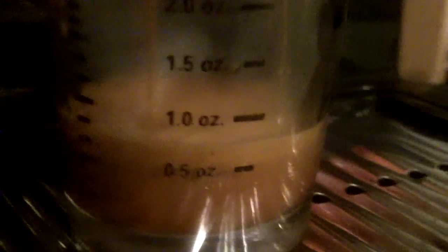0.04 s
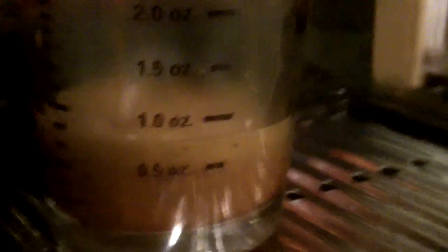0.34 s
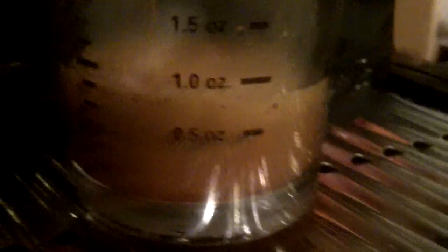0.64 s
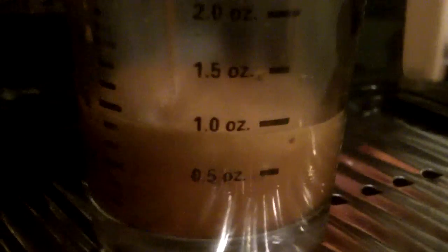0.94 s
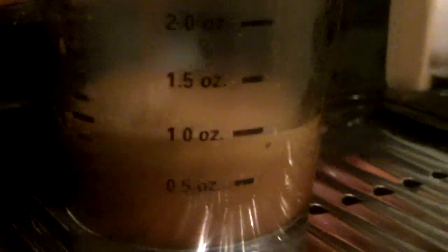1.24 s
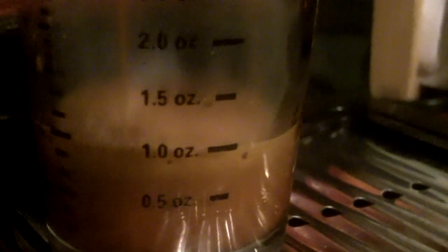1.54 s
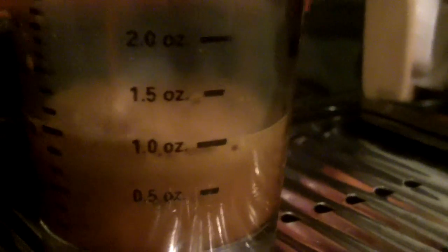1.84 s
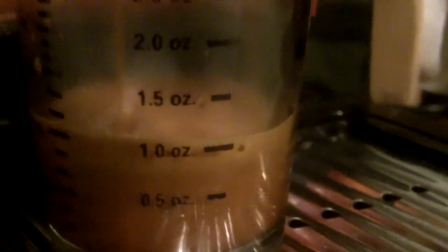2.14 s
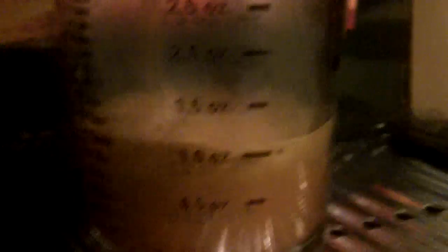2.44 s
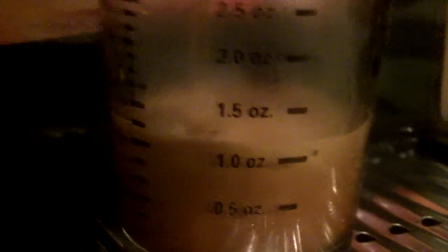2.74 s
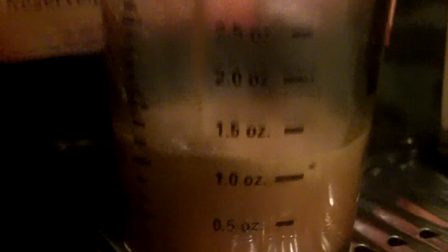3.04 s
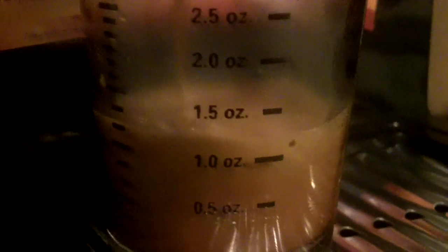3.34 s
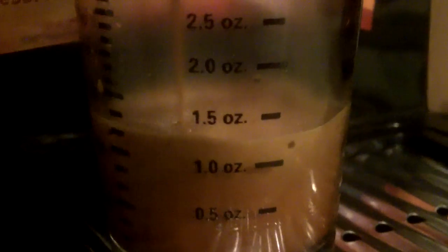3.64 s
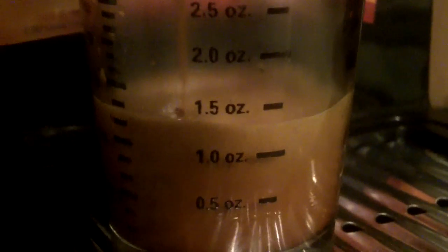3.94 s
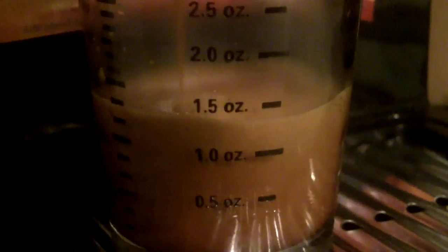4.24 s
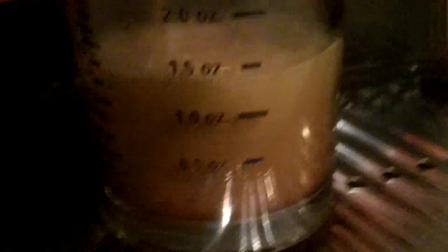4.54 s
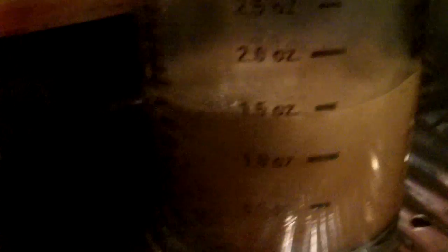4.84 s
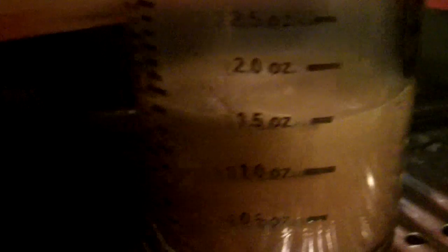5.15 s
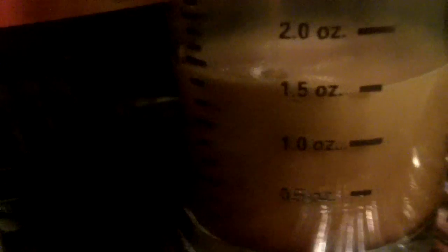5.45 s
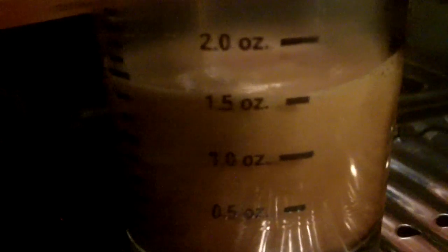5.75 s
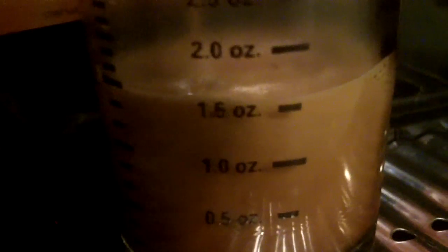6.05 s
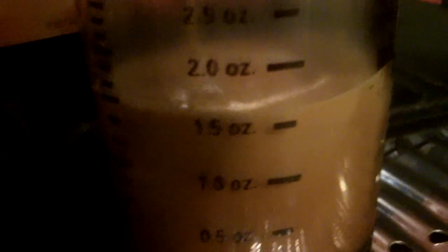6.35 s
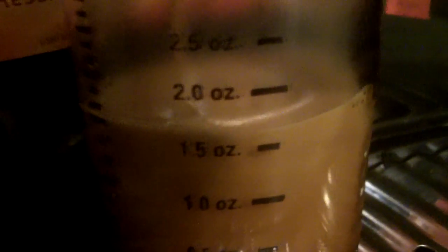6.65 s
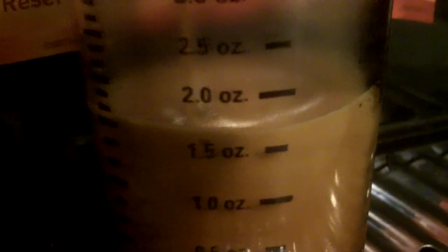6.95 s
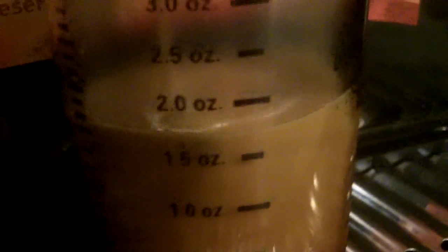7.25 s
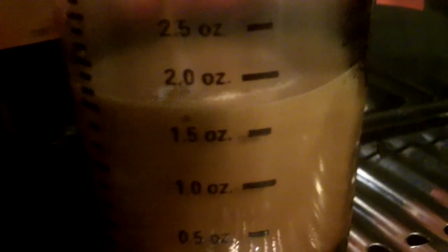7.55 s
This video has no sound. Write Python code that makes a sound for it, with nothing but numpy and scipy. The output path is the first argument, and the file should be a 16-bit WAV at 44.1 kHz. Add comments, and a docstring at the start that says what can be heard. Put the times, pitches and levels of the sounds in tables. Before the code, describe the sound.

An espresso machine's pump buzzes steadily up close, with metal rattling and coffee spitting and gurgling into a glass, turning harsher near the end.

```python
"""A quiet kitchen, where an espresso machine pulls a shot into a glass, heard close up.
The vibratory pump strokes once per mains cycle: its plunger knocks drone through the case and set
the panels and the steel drip tray chattering. Air in the water makes the spout spit, gurgle and
sizzle, and a few soft, low bumps pass underneath. Late on the valve strikes bare metal and the
buzz turns harsh."""
import sys
import numpy as np
from scipy import signal
from scipy.fft import rfft, irfft, next_fast_len
from scipy.io import wavfile
from scipy.ndimage import map_coordinates

SR = 44100
rng = np.random.default_rng(int(sys.argv[2]) if len(sys.argv) > 2 else 0)


def generate_wav(signal):
    """Clip the signal to [-1, 1] and save it as 16-bit WAV at the path in sys.argv[1]."""
    frames = np.transpose(np.atleast_2d(signal))
    scaled = np.clip(frames, -1, 1) * 32767
    pcm = np.round(scaled).astype(np.int16)
    wavfile.write(sys.argv[1], SR, pcm)


N = 343539

# room tone: (frequency [Hz], relative level [dB])
ROOM_EQ = [(8, -3), (25, 0.5), (45, -27), (100, -15), (300, -13), (1500, -43), (5000, -40), (15000, -56)]
# plunger knocks and rebounds in one stroke: (time [ms], strength [0-1], contact time [ms])
KNOCKS = [(2.1, .36, .22), (3.4, .45, .35), (5.2, .85, .27), (9.0, .95, .38), (10.5, .25, .35),
          (15.9, .7, .47)]
# the drone under a firm, an easing and a slack load: (harmonic [x mains], relative level [dB])
FIRM_DRONE = [(1, -6), (2, -11.5), (3, 2), (4, -14), (5, 2.5), (6, -8), (7, -15), (8, -5.5), (9, -2),
              (10, -4), (11, -21), (12, -11), (13, -19.5), (14, -12), (15, -25.5), (16, -15), (17, -13),
              (18, -68.5), (19, -22), (20, -51), (21, -32), (22, -49), (23, -32), (24, -30.5)]
EASING_DRONE = [(1, -5), (2, -8), (3, 4.5), (4, -22), (5, 1), (6, -8.5), (7, -7), (8, -5.5), (9, 0.5),
                (10, -2.5), (11, -6.5), (12, -12.5), (13, -9), (14, -18), (15, -50), (16, -14), (17, -31.5),
                (18, -9), (19, -18), (20, -43), (21, -26), (22, -99), (23, -46.5), (24, -21.5)]
SLACK_DRONE = [(1, -8.5), (2, -9), (3, 2.5), (4, -5), (5, 2.5), (6, -6.5), (7, -13), (8, -9), (9, 1),
               (10, -10.5), (11, -4.5), (12, -5.5), (13, -14.5), (14, -46), (15, -11.5), (16, -11.5),
               (17, -10), (18, -26), (19, -16), (20, -35), (21, -29), (22, -36), (23, -19.5), (24, -22)]
# the pump's load letting go: (time [s], ease [0 firm, 1 easing, 2 and up slack])
LOAD_EASE = [(0, 0.33), (4.2, 0), (5.2, 0.97), (5.5, 1.4), (6.4, 0.82), (7.0, 1.7), (7.5, 2), (7.79, 4)]
# air passing with the water: (start [s], end [s], strength [0-1])
GUSHES = [(.2, 1.1, 0.6), (1.3, 1.6, 0.26), (3.95, 4.9, 0.18), (5.3, 5.95, 0.93), (6.1, 6.6, 0.53),
          (6.85, 7.4, 0.4)]
# the hose shuddering: (start [s], end [s], level [dB])
SHUDDERS = [(0.44, 1.047, -38.5), (2.297, 3.4, -41.5), (3.95, 4.448, -51), (5.25, 5.513, -51)]
# rattle of the loose parts: (time [s], relative panel level [dB], relative tray level [dB])
RATTLE_LEVELS = [(0.0, -45, -42.5), (0.28, -48, -45.5), (0.39, -66, -48), (0.5, -44, -44.5),
                 (0.59, -55, -51.5), (0.67, -59, -46), (1.78, -50.5, -49.5), (3.01, -44.5, -45.5),
                 (3.9, -46, -48), (6.49, -41.5, -39), (6.75, -41, -48), (6.9, -43.5, -39.5),
                 (7.35, -43.5, -36.5), (7.55, -45, -47.5), (7.79, -42, -38)]
# a thin steel plate singing along: (time [s], relative level [dB])
PLATE_LEVELS = [(0.0, -59), (0.82, -52), (0.89, -66), (1.78, -61), (1.84, -53), (2.45, -58), (2.58, -50),
                (3.14, -53.5), (5.1, -50), (6.12, -41), (7.12, -49), (7.79, -43.5)]
# the valve hitting bare metal: (start [s], end [s], strength [0-1])
HARD_SPELLS = [(6.15, 6.6, .25), (6.66, 7.39, 0.89), (7.66, 7.79, .85)]
# resonances of each part: (frequency [Hz], width [Hz], relative level [dB])
HOSE_MODES = [(401, 52, 4.5), (790, 110, -6.5), (978, 160, -5), (1380, 98, -14.5)]
PANEL_MODES = [(1460, 100, -3), (1727, 107, -5), (1990, 115, -3), (2330, 31, 0.5), (2420, 44, -1.5)]
PLATE_MODES = [(2390, 57, 8), (5450, 11, -4.5)]
VALVE_MODES = [(3000, 370, -4.5), (3374, 130, 1.5), (3760, 310, -4)]
TRAY_MODES = [(5397, 29, 8), (5570, 160, -2), (6516, 123, 1.5), (7020, 55, -4), (7620, 43, -11),
              (7700, 140, -2), (8680, 68, -0.5), (9016, 23, -1), (9125, 140, -4.5), (10420, 78, -8),
              (10740, 80, -14.5), (13170, 280, -14.5)]
GLASS_MODES = [(3170, 160, -1), (6510, 134, 1.5)]
# tone of the squirts, hard valve hits, tray rattle and spray: (frequency [Hz], relative level [dB])
SQUIRT_EQ = [(60, -6.5), (200, -8.5), (400, -2), (650, 2.5), (850, 7), (1050, -1), (1300, -2.5),
             (1600, -11), (3000, -10.5), (6000, -51.5)]
HARD_VALVE_EQ = [(3500, -25), (5000, -31), (5450, 5), (6000, -10), (6500, -6), (7700, 6), (9000, -9),
                 (9900, -24), (10370, 4), (11000, -36), (12600, -20), (13150, -13), (15000, -43)]
TRAY_EQ = [(2590, -68.5), (4400, -18), (5160, -10), (5410, -5), (5970, -3.5), (6480, 3), (7570, 2.5),
           (8220, -5), (8920, -14.5), (9840, -8.5), (10600, -17), (11300, -16), (12100, -27), (13300, -30),
           (15100, -35)]
SPRAY_EQ = [(2000, -42), (4000, -21), (5200, 1), (6500, 2), (8000, 3), (10000, -17), (13000, -36),
            (15000, -26)]
# the loudest spits at the spout: (time [s], relative level [dB])
SPITS = [(0.1141, -33), (0.196, -23), (0.3501, -21), (0.5133, -24), (0.679, -23.5), (0.7597, -29),
         (0.782, -22), (0.9951, -27), (1.0799, -34), (1.279, -19), (1.4147, -27), (1.495, -28),
         (1.6466, -26), (1.8926, -25.5), (2.89, -24), (3.9853, -27), (4.6129, -18.5)]
# the largest bubbles: (time [s], level [dB])
BLIPS = [(0.2664, -23.5), (0.317, -25), (0.4188, -22), (0.4788, -24), (0.811, -24), (1.1077, -22.5),
         (1.278, -27), (1.4947, -25), (1.646, -22), (1.7596, -26)]
# soft bumps of a hand: (time [s], relative level [dB])
BUMPS = [(.23, -29), (.29, -23), (0.438, -26), (4.55, -34)]

MAINS_HZ = 60.0158
# chatter within a stroke: (under a firm load, change as it eases, change with hard valve hits)
PUSH_MS = (12.5, -3.5, 2.3)
RETURN_MS = (4.0, -2.9, .1)
RETURN_SHARE = (.15, 0.21, -0.24)


def amp(db):
    """Decibels to gain."""
    return 10 ** (np.asarray(db) / 20)


def unit(x):
    """Scaled to rms 1."""
    return x / np.sqrt(np.mean(x ** 2) + 1e-20)


def curves(rows, at=None):
    """An envelope for each column after the time, per sample or at given times."""
    times, *columns = np.transpose(rows)
    return [np.interp(np.arange(N) / SR if at is None else at, times, column) for column in columns]


def spells(rows, attack_s, release_s, at=None):
    """Each (start, end, size) rises, holds and dies away; per sample or at given times."""
    t = np.arange(N) / SR if at is None else at
    return sum(size * np.clip((t - start) / attack_s, 0, 1) * np.exp(-np.maximum(t - end, 0) / release_s)
               for start, end, size in rows)


def wobble(rate):
    """A smooth random curve, rate knots a second."""
    knots = rng.standard_normal(int(N * rate / SR) + 4)
    coarse = np.arange(0, N, 64)
    return np.interp(np.arange(N), coarse, map_coordinates(knots, [coarse * rate / SR]))


def filtered(x, response):
    """x through a complex frequency response."""
    size = 2 * next_fast_len(N // 2 + SR // 4)
    return irfft(rfft(x, size) * response(np.fft.rfftfreq(size, 1 / SR)), size)[:N]


def eq(x, points):
    """x through a minimum-phase EQ curve."""
    point_hz, db = np.transpose(points)

    def response(hz):
        gain = amp(np.interp(np.log(hz + 1), np.log(point_hz), db))
        cepstrum = irfft(np.log(gain))
        cepstrum[1:len(hz) - 1] *= 2
        cepstrum[len(hz):] = 0
        return np.exp(rfft(cepstrum))
    return filtered(x, response)


def ringing(x, modes):
    """x through a bank of resonators of alternating polarity."""
    def response(f):
        return sum((-1) ** k * amp(db) * 1j * f * width / (hz * hz - f * f + 1j * f * width)
                   for k, (hz, width, db) in enumerate(modes))
    return filtered(x, response)


def band(x, low_hz, high_hz, order=6):
    """Steep band-pass."""
    return filtered(x, lambda f: 1 / (1 + (low_hz / (f + 1)) ** order) / (1 + (f / high_hz) ** order))


def impulses(times, sizes):
    """Single blows at the given moments."""
    at = np.round(times * SR).astype(int)
    inside = (at >= 0) & (at < N)
    return np.bincount(at[inside], sizes[inside], N)


def bursts(blows, life_ms):
    """Every blow becomes a short burst of noise."""
    t = np.arange(SR // 20) / SR
    power = signal.fftconvolve(blows ** 2, np.exp(-2000 * t / life_ms))[:N]
    return np.sqrt(np.abs(power)) * rng.standard_normal(N)


def strokes():
    """Start time of every pump stroke."""
    return np.arange(int(N / SR * MAINS_HZ) + 1) / MAINS_HZ


def air(at=None):
    """How much air the water carries, 0-1."""
    return spells(GUSHES, attack_s=.083, release_s=.34, at=at)


def hardness(at=None):
    """How hard the valve strikes, 0-1."""
    return spells(HARD_SPELLS, attack_s=.15, release_s=.05, at=at)


def per_stroke(rule):
    """A value for each stroke that follows the load and the valve."""
    firm, eased, hard = rule
    start = strokes()
    return firm + eased * np.tanh(1.5 * curves(LOAD_EASE, start)[0]) + hard * hardness(start)


def room_tone(level_db=-44.5):
    """A bed of quiet kitchen air, mostly low rumble."""
    return amp(level_db) * unit(eq(rng.standard_normal(N), ROOM_EQ))


def pump_drone(level_db=-21, db_per_ease=-.5, hard_lift_db=1, nasal_hz=990, strain_hz=1220):
    """The knocks set the phases of the mains harmonics; the case and the load set their strength."""
    t = np.arange(N) / SR
    ease, = curves(LOAD_EASE)
    hard = hardness()
    nasal_db = 1.5 - 7 * air()  # the case honks; air in the water cushions it
    crossfade = np.maximum(0, 1 - np.abs(np.clip(ease, 0, 2) - np.arange(3)[:, None]))
    knock_ms, strength, contact_ms = np.transpose(KNOCKS)
    phase = 2 * np.pi * MAINS_HZ * (t + 1e-5 * wobble(40))
    hum = np.zeros(N)
    for (k, firm_db), (_, easing_db), (_, slack_db) in zip(FIRM_DRONE, EASING_DRONE, SLACK_DRONE):
        hz = k * MAINS_HZ
        rad_per_ms = 2 * np.pi * hz / 1000
        reach = strength * np.exp(-(rad_per_ms * contact_ms) ** 2 / 2)  # soft contacts lack top end
        lag = np.angle(np.sum(reach * np.exp(1j * rad_per_ms * knock_ms)))
        harmonic_db = np.array([firm_db, easing_db, slack_db]) @ crossfade
        harmonic_db += nasal_db * np.exp(-((hz - nasal_hz) / 250) ** 2)
        harmonic_db += 3 * hard * np.exp(-((hz - strain_hz) / 300) ** 2)
        drift_db = k * wobble(1.52) / 10 + 0.45 * wobble(25)  # high harmonics waver most
        hum += amp(harmonic_db + drift_db) * np.cos(k * phase - lag)
    return amp(level_db + db_per_ease * ease + hard_lift_db * hard) * unit(hum)


def hose(rest_db=-54.5, slosh_db=-41):
    """Odd and even strokes load the hose differently: it shudders at half rate. Airy water sloshes."""
    start = strokes()
    swells = [(begin, end, amp(db)) for begin, end, db in SHUDDERS]
    envelope = amp(rest_db) + spells(swells, attack_s=.14, release_s=.17)
    size = (-1) ** np.arange(len(start)) * amp(1.2 * rng.standard_normal(len(start)))
    shudder = unit(band(ringing(impulses(start + .002476, size), HOSE_MODES), 250, 1600))
    slosh = unit(band(ringing(rng.standard_normal(N), HOSE_MODES[:1]), 360, 470))
    return envelope * shudder + amp(slosh_db) * air() * slosh


def squirts(calm_db=-44, gush_db=-37):
    """Each stroke forces a turbulent squirt, louder when the water carries air."""
    start = strokes()
    turbulence = bursts(impulses(start + .0022, np.ones(len(start))), life_ms=53)
    envelope = np.hypot(amp(calm_db), amp(gush_db) * np.sqrt(air()))
    return envelope * unit(eq(turbulence, SQUIRT_EQ))


def chatter(gap_ms, scatter_ms, uneven_db, limp_db, loss_db=2, count=3):
    """A loose part is thrown at the push and the return of each stroke and bounces a few times."""
    start = strokes()
    share = np.clip(per_stroke(RETURN_SHARE), 0, 1)
    bounce = np.arange(count)
    alternate = (-1) ** np.arange(len(start))[:, None]
    blows = np.zeros(N)
    for first_ms, power in ((per_stroke(PUSH_MS), 1 - share), (per_stroke(RETURN_MS), share)):
        late, size = rng.standard_normal((2, len(start), count))
        delay_ms = first_ms[:, None] + gap_ms * bounce + scatter_ms * late
        hit_db = uneven_db * size + limp_db * alternate - loss_db * bounce
        blows += impulses(start[:, None] + delay_ms / 1000, np.sqrt(power)[:, None] * amp(hit_db))
    return blows


def panels(trim_db=-1, body_db=1, plate_trim_db=-2):
    """Loose side panels buzz over a dull body, and one thin plate rings on."""
    blows = chatter(gap_ms=2.3, scatter_ms=.03, uneven_db=1.8, limp_db=1.0)
    contact = unit(blows) + .6 * unit(bursts(blows, life_ms=3))
    buzz = unit(band(ringing(contact, PANEL_MODES), 1500, 3030))
    body = amp(body_db) * unit(band(blows, 700, 1200))
    plate = unit(band(ringing(unit(blows), PLATE_MODES), 2400, 6300))
    panel_gain = amp(curves(RATTLE_LEVELS)[0] + trim_db)
    plate_gain = amp(curves(PLATE_LEVELS)[0] + plate_trim_db)
    return panel_gain * (buzz + body) + plate_gain * plate


def sheet_metal(blows, life_ms):
    """Dense, quickly dying modes: the same ring for every blow."""
    t = np.arange(SR // 25) / SR
    tail = rng.standard_normal(len(t)) * np.exp(-1000 * t / life_ms)
    return unit(signal.fftconvolve(blows, tail)[:N])


def valve(soft_trim_db=-15, hard_db=-46, edge_db=-43):
    """One even clack per stroke, dull at first, hard and metallic near the end."""
    start, hard = strokes(), hardness()
    late, size = rng.standard_normal((2, len(start)))
    blows = impulses(start + (per_stroke(PUSH_MS) + .008 * late) / 1000, amp(.7 * size))
    clack = unit(blows) + .3 * unit(bursts(blows, life_ms=2.5))
    dull = unit(band(ringing(clack, VALVE_MODES), 2340, 3450, order=12))
    bright = unit(eq(clack + .8 * sheet_metal(blows, life_ms=1.5), HARD_VALVE_EQ))
    dull_gain = amp(curves(RATTLE_LEVELS)[0] + soft_trim_db) + amp(hard_db) * hard
    return dull_gain * dull + amp(edge_db) * hard * bright


def drip_tray(ring_db=-7.5, ring_db_per_s=1.25, duck_db=4):
    """The steel grate chatters: tiny bright contacts that ring its modes more as the shot goes on."""
    blows = chatter(gap_ms=2.1, scatter_ms=.04, uneven_db=2.1, limp_db=1.13)
    grit = sheet_metal(blows, life_ms=5.4) + 0.9 * unit(bursts(blows, life_ms=2.3))
    rattle = unit(eq(grit, TRAY_EQ))
    contact = unit(blows) + unit(bursts(blows, life_ms=1))
    ring = unit(band(ringing(contact, TRAY_MODES), 5230, 13300, order=12))
    ring_gain = amp(ring_db + ring_db_per_s * np.arange(N) / SR)
    envelope = amp(curves(RATTLE_LEVELS)[1] - duck_db * hardness())  # ducks under hard valve hits
    return envelope * (rattle + ring_gain * ring) / np.hypot(1, ring_gain)


def bubble_pitch(when, settled_hz=938.5, extra_hz=356, settle_s=.915):
    """Bubbles start high and settle in pitch as the glass fills."""
    return settled_hz + extra_hz * np.exp(-when / settle_s)


def bubbles(when, db, hz, life_ms):
    """Each bubble is a short ring that rises in pitch."""
    t = np.arange(SR // 20) / SR
    envelope = np.exp(-1000 * t / life_ms) * (1 - np.exp(-t / .0007))
    ring = envelope * np.sin(2 * np.pi * hz[:, None] * t * (1 + 0.96 * t))
    at = (when * SR).astype(int)[:, None] + np.arange(len(t))
    return np.bincount(at.ravel(), (amp(db)[:, None] * ring).ravel(), N)[:N]


def gurgle(count=600, calm_db=-53, gush_lift_db=13, spread_db=11):
    """Small bubbles swell with the air in the water; a few larger blips pop early in the shot."""
    position, pitch, size = rng.random((count, 3)).T
    when = position * N / SR
    level_db = calm_db + gush_lift_db * np.sqrt(air(when)) + spread_db * size
    small = bubbles(when, level_db, bubble_pitch(when) * np.exp(.35 * (pitch - .5)), life_ms=8.3)
    blip_s, blip_db = np.transpose(BLIPS)
    return small + bubbles(blip_s, blip_db, bubble_pitch(blip_s), life_ms=6.5)


def spits(tick_trim_db=-5, ring_trim_db=26, spread_db=8, fade_from_s=3, fade_db_per_s=2):
    """Air pockets burst in sharp ticks and drips ring the glass: a few loud, over a fine sputter."""
    spit_s, spit_db = np.transpose(SPITS)
    start = strokes()
    late, size = rng.standard_normal((2, len(start)))
    sputter_db = -33 - fade_db_per_s * np.maximum(start - fade_from_s, 0)
    delay_ms = 16.5 - 2.5 * start + 1.3 * late  # the sputter creeps earlier in the stroke
    sputter = impulses(start + delay_ms / 1000, amp(sputter_db + spread_db * np.tanh(size - 1)))
    pops = impulses(spit_s, amp(spit_db + tick_trim_db)) + sputter
    drips = impulses(spit_s, amp(spit_db + ring_trim_db)) + amp(28.5) * sputter
    ticks = eq(bursts(pops, life_ms=1.9), SPRAY_EQ)
    glass = band(ringing(drips, GLASS_MODES), 2580, 7600)
    return ticks + glass


def sizzle(level_db=-54, growth_db_per_s=1.1):
    """Airy water sizzles at the spout in a puff per stroke, louder as the shot goes on."""
    start = strokes()
    puffs = bursts(impulses(start + per_stroke(PUSH_MS) / 1000, np.ones(len(start))), life_ms=11)
    envelope = amp(level_db + growth_db_per_s * np.arange(N) / SR) * air()
    return envelope * unit(eq(puffs, SPRAY_EQ))


def hand_bumps(trim_db=23.5):
    """Soft bumps of a hand land as short sub-bass thuds."""
    times, db = np.transpose(BUMPS)
    return band(bursts(impulses(times, amp(db + trim_db)), life_ms=19), 12, 78, order=3)


def scene():
    """Machine, spout and kitchen in one mono mix, the same on both channels."""
    machine = pump_drone() + hose() + squirts() + panels() + valve() + drip_tray()
    spout = gurgle() + spits() + sizzle()
    mix = machine + spout + hand_bumps() + room_tone()
    return np.array([mix, mix])


def record(dry, notch_hz=4213, notch_width_hz=600, top_hz=15100):
    """Master EQ: a deep notch in the treble and a brick-wall high cut."""
    def response(f):
        notch = (notch_hz ** 2 - f * f) / (notch_hz ** 2 - f * f + 1j * f * notch_width_hz)
        return notch * (f < top_hz)
    return np.array([filtered(channel, response) for channel in dry])


dry = scene()
out = record(dry)
generate_wav(out)
```